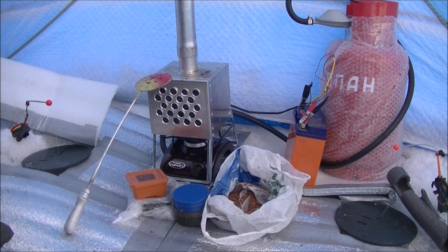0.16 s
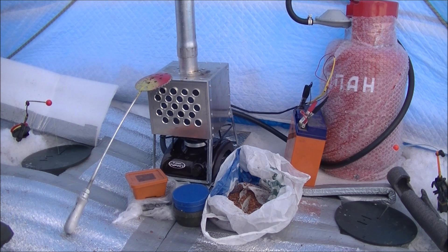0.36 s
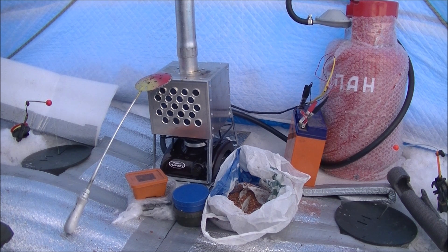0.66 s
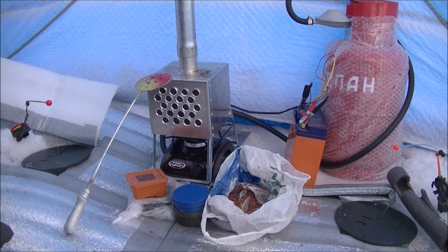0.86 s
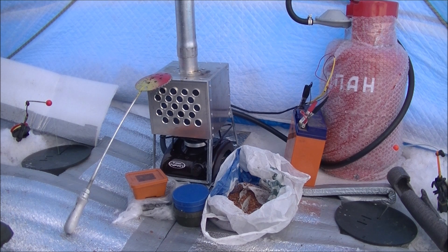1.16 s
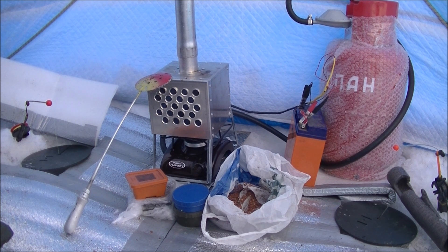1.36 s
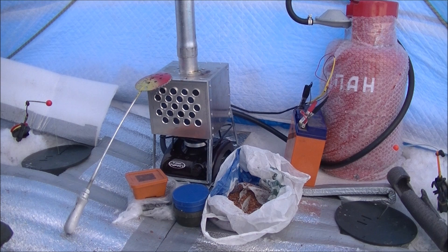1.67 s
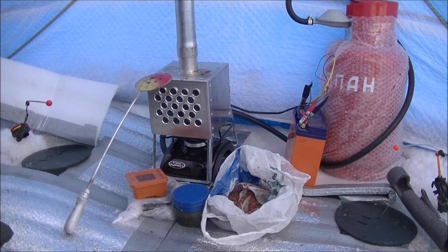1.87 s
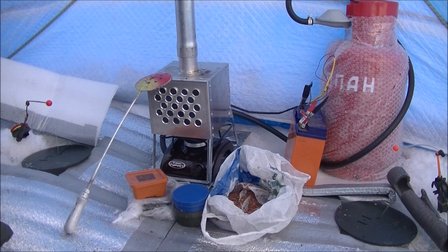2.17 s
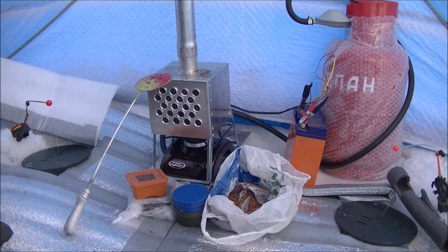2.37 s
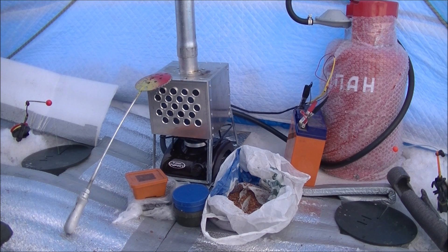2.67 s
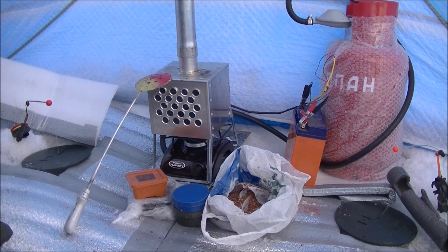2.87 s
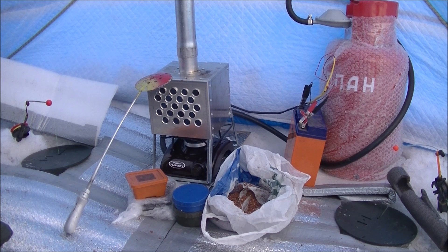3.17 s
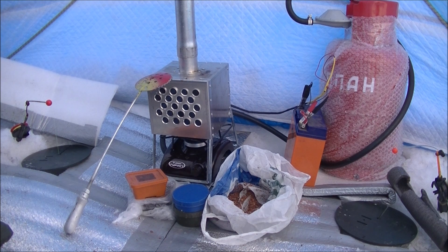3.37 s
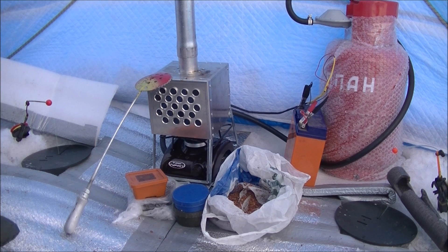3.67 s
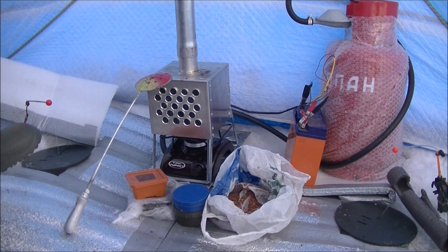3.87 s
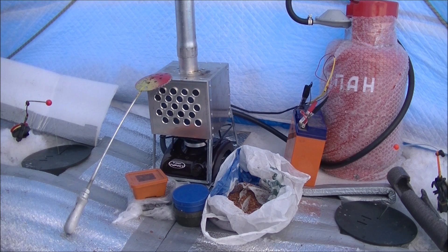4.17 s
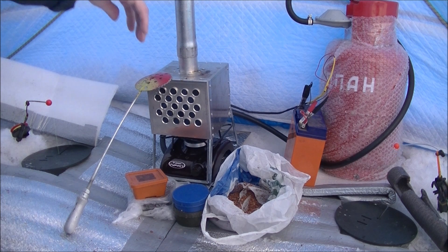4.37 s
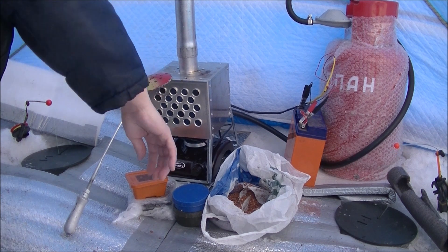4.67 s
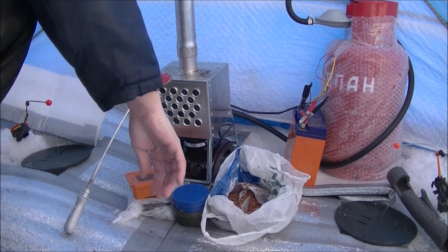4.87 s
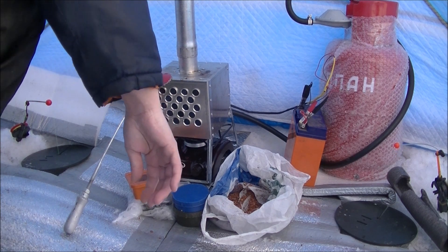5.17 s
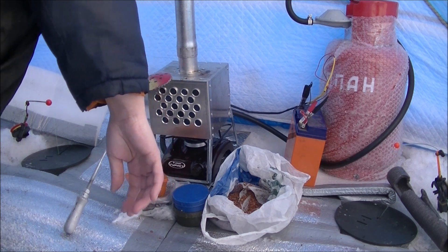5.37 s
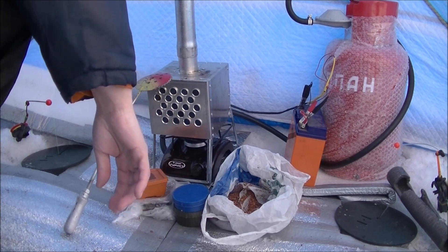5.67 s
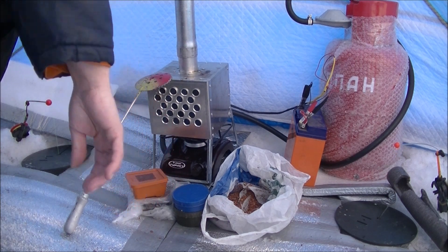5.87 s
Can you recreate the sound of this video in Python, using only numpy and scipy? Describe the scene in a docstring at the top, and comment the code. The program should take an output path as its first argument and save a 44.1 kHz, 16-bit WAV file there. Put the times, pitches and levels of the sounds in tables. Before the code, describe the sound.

Padded nylon jacket rustles and creases close to the microphone, with sharp fabric snaps and a brief metal rattle over a faint steady burner hiss.

```python
"""Inside a tent, a padded nylon jacket rubs and creases close to a small stereo camera.
Fibre slips make the rub; folds and seams snap as short cracks, padding gives hollow notes, a taut fold hums.
A metal piece of gear chatters as dying modes, and weight shifts thump the floor mat as low noise.
A gas burner hisses behind with a faint whistle; two microphone ports hear the near sounds and the hiss
with different stereo widths."""
import sys
import numpy as np
from scipy import signal
from scipy.fft import rfft, irfft, next_fast_len
from scipy.io import wavfile
from scipy.ndimage import uniform_filter1d

SR = 44100
rng = np.random.default_rng(int(sys.argv[2]) if len(sys.argv) > 2 else 0)


def makeup_ratio(level_db):
    """Linear amplitude ratio for a level in decibels (20 dB per factor of ten)."""
    decades = np.asarray(level_db, float) / 20
    return 10 ** decades


def store_wav(level_fs):
    """Save 16-bit WAV to argv[1]."""
    pcm = np.round(np.clip(np.atleast_2d(level_fs), -1, 1) * 32767)
    wavfile.write(sys.argv[1], SR, pcm.T.astype(np.int16))


N = 265482  # length in samples


def evened(x):
    """Scales to rms 1."""
    return x / np.sqrt(np.mean(x ** 2) + 1e-20)


def read(points, hz):
    """Reads a table on a log-frequency axis."""
    f, value = np.transpose(points)
    return np.interp(np.log(hz + 1), np.log(f + 1), value)


def add(mix, s, sound):
    """Mixes a sound in at s seconds."""
    part = mix[:, round(s * SR):][:, :sound.shape[1]]
    part += sound[:, :part.shape[1]]


def colour(x, gain):
    """Filters by a gain that is a function of frequency."""
    length = x.shape[-1]
    size = next_fast_len(length)
    spectrum = rfft(x, size) * gain(np.fft.rfftfreq(size, 1 / SR))
    return irfft(spectrum, size)[..., :length]


def below(hz, edge_hz, steep=8):
    """Share under a soft edge, falling from 1 to 0 through one half at the edge."""
    return 1 / (1 + (hz / edge_hz) ** steep)


def control_times():
    """Times in seconds of the slow controls, one every millisecond."""
    return np.arange(0, N / SR + 1, 1 / 1000)


def curve(rows, column):
    """One column of a timed table, every millisecond."""
    s, value = np.transpose(rows)[[0, column]]
    return np.interp(control_times(), s, value)


def sampled(control):
    """A millisecond control at every sample."""
    return np.interp(np.arange(N) / SR * 1000, np.arange(len(control)), control)


def swells(rows, under_db):
    """Level of overlapping swells every millisecond, and their further columns weighted by strength."""
    pointed = 0.93  # 1 = straight slopes in dB to a sharp crest, 2 = a round crest
    s, db, rise, fall, *marks = np.transpose(rows)[..., None]
    late = control_times() - s
    slope = abs(late / np.where(late < 0, rise, fall)) ** pointed
    power = makeup_ratio(2 * db - 48.7 * slope)  # one rise or fall time away, a swell is 24.35 dB down
    total = power.sum(0) + makeup_ratio(2 * under_db)
    return 10 * np.log10(total), *[(power * mark).sum(0) / total for mark in marks]


def narrow(hz, pole_width_hz):
    """Noise through two equal poles, carried on a moving note, at rms 1."""
    carrier = np.exp(2j * np.pi * np.cumsum(hz * np.ones(N)) / SR)
    r = np.exp(-np.pi * pole_width_hz / SR)
    a, b = signal.lfilter([1], np.convolve([1, -r], [1, -r]), rng.standard_normal((2, 2, N)))
    return evened((carrier * (a + 1j * b)).real)


def hum(rows, pole_width_hz, rest_db=-110):
    """Swells of noise around a note that glides from row to row."""
    level_db = swells(rows, rest_db)[0]
    return makeup_ratio(sampled(level_db)) * narrow(sampled(curve(rows, column=4)), pole_width_hz)


def ring(hz, t60, contact):
    """A dying sine with a soft start (contact in seconds), and the same note at another phase."""
    t = np.arange(round(t60 * SR) + 8) / SR
    phase = 2 * np.pi * (hz * t + np.array([[0], [rng.random()]]))
    return np.minimum(t / contact, 1) * makeup_ratio(-60 * t / t60) * np.sin(phase)


def burner(waver_hz=18):
    """Steady hiss of the flame and the air as shaped noise, with a faint wavering whistle at the jet."""
    # Hiss spectrum. Each row: frequency in Hz, relative density in dB per Hz.
    hiss_shape = [(15, -71), (25, -21), (75, -6.5), (189, -2.5), (228, -2.5), (290, -3.5), (423, -6.5),
                  (472, -15), (808, -13.5), (1150, -18), (1390, -10.5), (3030, -4.5), (3370, -0.5),
                  (6440, -12), (15700, -15.5)]
    # Strength of the jet whistle. Each row: time in seconds, level in dB.
    whistle_level = [(0, -84), (2, -77), (2.4, -70), (3.15, -75), (3.4, -71), (3.7, -92), (4.2, -110)]
    hiss = evened(colour(rng.standard_normal((2, N)), lambda f: makeup_ratio(read(hiss_shape, f))))
    waver = evened(uniform_filter1d(rng.standard_normal(N), SR // 5))
    whistle = narrow(3400 + waver_hz * waver, 9)
    return makeup_ratio(-66.5) * hiss + makeup_ratio(sampled(curve(whistle_level, column=1))) * whistle


def cloth(hz):
    """Gain of the fabric's spectrum, raised at the hollow notes of the folded jacket."""
    # Fabric close to the microphone. Each row: frequency in Hz, relative density in dB per Hz.
    fabric = [(120, -57), (200, -20), (326, -17), (494, -16.5), (560, -20.5), (696, -21.5), (1000, -18.5),
              (1720, -9.5), (2600, -4.5), (3500, 1), (4900, 2.5), (7020, -9.5), (9600, -7), (11000, -18),
              (13500, -24), (15700, -21)]
    # Hollow notes of the padding. Each row: note in Hz, width in Hz, boost in dB.
    hollows = [(283, 120, 2.5), (560, 36, 6)]
    boost_db = sum(db / (1 + (2 * (hz - f) / width) ** 2) for f, width, db in hollows)
    return makeup_ratio(read(fabric, hz) + boost_db)


def rub(slips_per_s=17000, spread_db=0.33, patchy_db=0.76, ribs_db=2.23, flicker_db=0.07, lumpy_db=3.0,
        pivot_hz=4200):
    """Dense fibre slips of uneven size; patches of weave drift through the spectrum under each stroke."""
    # Sleeve strokes. Each row: loudest moment in seconds, 2.5-6.5 kHz level in dB, rise and fall in
    # seconds, brightness in dB per octave, extra body in dB.
    strokes = [(1.008, -55, 0.06, 0.43, 1, 3), (1.064, -40, .015, 0.042, 0.5, -14),
               (1.189, -39.5, 0.06, 0.039, -7, 4), (1.381, -43.5, 0.0055, 0.04, -11.5, 13),
               (1.83, -51.5, 0.067, .1, -2, 1), (1.884, -39, 0.065, 0.076, -3, -5),
               (2.113, -56.5, 0.024, 0.083, -10, 15.5), (2.17, -41.5, 0.059, 0.098, -0.5, -2.5),
               (2.407, -39, 0.0026, 0.032, -8, 11), (2.47, -48, 0.09, .12, -1.5, 4),
               (2.714, -48.5, 0.087, 0.11, 1, -1), (2.778, -52.5, 0.12, 0.03, -9, 11),
               (2.969, -51.5, .02, 0.15, -2, 4), (3.015, -50, 0.1, 0.076, -1, -9),
               (3.111, -59, 0.081, 0.13, -9, 9.5), (3.5, -54.5, 0.13, 0.86, -1.5, -1),
               (3.65, -50, .02, 0.44, -1, 12), (3.75, -41.5, 0.25, 0.23, -3, -3.5),
               (3.805, -38.5, 0.098, 0.13, -0.5, -5.5), (3.881, -38, 0.037, 0.04, 7.5, 3.5),
               (4.02, -45, 0.27, 0.17, 1, 4), (4.07, -40, 0.14, 0.11, 3.5, -2),
               (4.118, -38, 0.23, 0.026, -2, -8.5), (4.22, -49, 0.17, 0.31, 0, 3.5),
               (4.285, -46, 0.042, 0.16, 3, 0.5), (4.338, -34.5, 0.055, 0.076, -3.5, -.7),
               (4.41, -43, 0.073, 0.23, 5, 7), (4.484, -42.5, 0.43, 0.21, -1.5, -4),
               (4.6, -50, 0.32, .3, 2, -3), (4.735, -45, 0.5, 0.66, -3, 1.5),
               (4.845, -39, 0.13, 0.12, 3, -4), (4.9, -48, 0.16, 0.13, -3, 10),
               (5.041, -49, 0.75, 0.15, 5, -3.7), (5.162, -51.5, 0.24, 0.23, 3, -4),
               (5.296, -51.5, 0.099, 0.17, 3, 2.5), (5.394, -50.5, 0.1, 0.28, -0.5, -6),
               (5.478, -47.5, 0.19, 0.13, 3.5, -2), (5.547, -55, 0.25, 0.44, 2.5, 0),
               (6.017, -50, 0.092, .1, 2.5, -1.5)]
    # The jacket never quite rests. Each row: time in seconds, rub between strokes in dB.
    fidget = [(0, -67.5), (.487, -67), (.762, -61.5), (.856, -63), (.968, -59.5), (1.28, -57), (1.44, -57),
              (1.556, -65), (1.72, -59.5), (1.8, -62), (2.03, -64.5), (2.39, -70.5), (2.64, -73),
              (2.82, -65.5), (2.92, -63), (3.2, -68.5), (3.4, -73), (5.71, -68), (5.9, -57), (6.02, -59.5)]
    # Slow level of the other bands against the rub.
    # Each row: time in seconds, treble in dB, low-middle in dB, bass in dB.
    band_levels = [(0, -10, -8.5, -17), (.8, -12, -11.5, -23), (1.2, -13, -16.5, -25.5),
                   (1.45, -17, -14, -25), (1.6, -4, -13, -22.5), (1.9, -12, -13, -21),
                   (2.5, -8.5, -14.5, -17), (2.7, -6, -12.5, -20), (2.9, -13, -15, -22),
                   (3.15, -10, -13, -18), (3.5, -7.5, -11.5, -22.5), (3.8, -7.5, -9, -23.5),
                   (4.0, -1, -4, -17), (4.25, -7.5, -6, -15), (4.7, -5.5, -9.5, -21.5),
                   (5.0, -9.5, -6, -20), (5.45, -10, -11.5, -26.5), (6.02, -7.5, -7, -23)]
    # How treble, low-middle and bass answer a stroke, one row for each band.
    # Each row: dB per dB of rub above medium, dB per unit of brightness, share of the extra body.
    answers = [(-0.085, 0.42, -0.23), (-0.024, -.2, 1), (-0.36, -.1, 0.56)]
    medium_db = -52
    low, mid, high = 900, 2500, 6500  # band edges in Hz

    chance, size = rng.random(N), rng.exponential(1, N)
    slips = (chance < slips_per_s / SR) * makeup_ratio(spread_db * np.minimum(size, 5))
    slips = slips * rng.standard_normal((2, N))
    hz, s, z = signal.stft(slips, SR, nperseg=256, noverlap=192)
    grid = z.T.shape[:2]  # frames, frequencies

    patches = uniform_filter1d(rng.standard_normal(grid), 22, 0)
    patches = evened(uniform_filter1d(patches, 5, 1)).T
    # ribs of the weave sing short narrow notes
    ribs = evened(uniform_filter1d(rng.standard_normal(grid), 24, 0)).T
    flicker = evened(uniform_filter1d(rng.standard_normal(len(s)), 8))
    # big folds buckle one by one, mostly in the low end
    lumps = evened(uniform_filter1d(rng.standard_normal(len(s)), 12))
    lumps_db = lumpy_db * np.outer(below(hz, 1970, steep=1.5), lumps)

    rub_db, bright, body_db = swells(strokes, curve(fidget, column=1))
    # brightness tilts the middle band alone
    octaves = np.log2(np.clip(hz, mid, high) / pivot_hz) * (hz > mid) * (hz < high)
    bright_db = np.outer(octaves, np.interp(s * 1000, np.arange(len(bright)), bright))
    texture_db = patchy_db * patches + ribs_db * ribs + flicker_db * flicker + lumps_db + bright_db
    weave = signal.istft(z * makeup_ratio(texture_db), nperseg=256, noverlap=192)[1][:, :N]

    shares = [lambda f: below(f, high) - below(f, mid),  # middle
              lambda f: 1 - below(f, high),  # treble
              lambda f: below(f, mid) - below(f, low),  # low-middle
              lambda f: below(f, low)]  # bass
    against = [0]  # the middle band follows the rub itself
    for k, (follow, lift, body_share) in enumerate(answers):
        answer_db = follow * (rub_db - medium_db) + lift * bright + body_share * body_db
        against.append(curve(band_levels, column=k + 1) + answer_db)
    out = np.zeros((2, N))
    for db, share in zip(against, shares):
        band = evened(colour(weave, lambda f: cloth(f) * np.sqrt(share(f))))
        out += makeup_ratio(sampled(rub_db + db)) * band
    return out


def snaps(t60=0.0087, width=0.12, hump_db=7, crest_db=10, rise=0.00037, walls_db=-12, walls_t60=0.11,
          thin_hz=350):
    """A crease lets go: a crack humped where that fold resonates, with a quieter tail for the soft walls."""
    # Creases and seams letting go. Each row: crest in seconds, level in dB before the crest allowance
    # and the final filter, centre in Hz.
    seams = [(0.0151, -30, 3930), (0.02, -34, 3770), (0.1206, -35.5, 3100), (0.3076, -35.5, 5200),
             (1.062, -44, 3900), (1.0676, -32, 3820), (1.119, -32.5, 3100), (1.1837, -33, 3120),
             (1.1916, -32, 4130), (1.379, -27, 2570), (1.383, -21, 2790), (2.096, -42, 3000),
             (2.1121, -34, 3690), (2.1723, -39, 4400), (2.2672, -37.5, 3800), (2.4052, -22.5, 3960),
             (2.411, -16.5, 4460), (2.4706, -33, 2270), (2.475, -35.5, 3790), (2.7704, -33, 2740),
             (2.772, -30, 3740), (2.9667, -41, 4110), (3.1012, -34.5, 2800), (3.649, -31, 4070),
             (3.6712, -27, 2500), (3.8854, -30, 4830), (3.9365, -22.5, 4260), (4.3246, -34, 3740),
             (4.3313, -16, 2700), (4.409, -30, 1500), (4.68, -25, 1290), (4.739, -19, 4030),
             (4.8388, -19, 5010), (4.875, -22, 4460), (4.8944, -22, 4640)]
    out, t = np.zeros((2, N)), np.arange(4096) / SR
    decay = makeup_ratio(-60 * t / t60) + makeup_ratio(walls_db - 60 * t / walls_t60)
    shape = np.minimum(t / rise, 1) * decay
    for (s, db, hz), noise in zip(seams, rng.standard_normal((len(seams), 2, 4096))):
        # the hump's width is in octaves
        hump = lambda f: cloth(f) * makeup_ratio(hump_db * np.exp(-(np.log2(f / hz + 1e-9) / width) ** 2))
        add(out, s - rise, makeup_ratio(db - crest_db) * shape * evened(colour(noise, hump)))
    # a thin sheet radiates no bass
    return colour(out, lambda f: below(f, 9100) - below(f, thin_hz, steep=2.7))


def gear():
    """Each bounce rings the same metal modes, harder ones shorter in contact and brighter; also lone pings."""
    # Bounces of the metal piece.
    # Each row: start in seconds, level in dB before the mode's own, hardness in dB per octave.
    bounces = [(1.1475, -18, -13), (1.1531, -26.5, 4.5), (1.1567, -22, -0.5), (1.161, -30.5, 7.5),
               (1.164, -24.5, -4), (1.167, -26, -9), (1.175, -46, -12), (1.181, -45, -6)]
    # Modes of the metal piece. Each row: note in Hz, relative level in dB, 60 dB decay in seconds.
    modes = [(2600, -16.5, 0.054), (2870, -2.5, 0.033), (3180, -1, 0.032), (3300, -17, 0.016),
             (4070, -11.5, 0.032), (5660, 0.5, 0.029), (6020, -11, .02), (6300, -15.5, 0.024),
             (9780, -15, 0.019)]
    # Faint single notes of small gear.
    # Each row: start in seconds, level in dB, note in Hz, 60 dB decay in seconds.
    pings = [(1.15, -53.5, 2832, 1.3), (1.974, -55, 1940, .08), (2.01, -67, 1945, .6),
             (.124, -60, 1400, .05), (1.19, -51, 1170, .06), (1.238, -47, 4300, .03),
             (3.875, -47, 1610, .06), (4.19, -57, 423, .5)]
    out = np.zeros((2, N))
    for s, db, hard_db in bounces:
        contact = 0.0011 * makeup_ratio(-.6 * hard_db)
        for hz, mode_db, t60 in modes:
            level_db = db + mode_db + hard_db * np.log2(hz / 3000)
            add(out, s, makeup_ratio(level_db) * ring(hz, t60, contact))
    for s, db, hz, t60 in pings:
        add(out, s, makeup_ratio(db) * ring(hz, t60, 0.00051))
    return out


def thumps(thin_hz=38):
    """Weight shifts on the floor mat: swells of low noise around its note, thinned at the very bottom."""
    # Each row: loudest moment in seconds, level in dB before thinning, rise and fall in seconds, note in Hz.
    shifts = [(1.012, -59.5, .03, .18, 84.7), (1.19, -83, .1, .2, 114), (3.72, -74, 0.076, .5, 100),
              (3.904, -62.5, .07, 0.25, 79), (4.176, -70, 0.078, 0.68, 97.3), (4.4, -66, .5, .3, 104.5),
              (4.498, -54, .05, 0.098, 106), (4.622, -59, 0.13, 0.28, 80.7), (4.91, -67, 0.19, .21, 99)]
    return colour(hum(shifts, 68), lambda f: 1 - below(f, thin_hz, steep=1.8))


def bumps(t60=0.054, contact=0.0068):
    """The padding is pressed and gives a short hollow note."""
    # Each row: start in seconds, level in dB before the soft start, note in Hz.
    presses = [(1.376, -50.5, 648), (1.874, -55.5, 560), (2.169, -51.5, 560), (2.401, -53, 525),
               (2.451, -44, 492), (2.514, -51, 300), (2.715, -51.5, 574), (2.755, -52.5, 473),
               (2.965, -56.5, 562), (3.102, -47, 524), (3.126, -51.5, 526), (3.672, -46.5, 310),
               (3.879, -49, 335), (4.046, -48, 425), (4.283, -42, 323), (4.33, -49, 555), (4.407, -52, 329),
               (4.473, -42.5, 327), (4.596, -50, 278), (4.72, -47.5, 334), (4.844, -41.5, 545),
               (4.889, -40.5, 550), (4.899, -42, 320), (4.93, -49, 390), (5.04, -55, 334)]
    out = np.zeros((2, N))
    for s, db, hz in presses:
        add(out, s, makeup_ratio(db) * ring(hz, t60, contact))
    return out


def dragged_fold():
    """A taut fold hums while it is dragged: swells of noise around a moving note."""
    # Each row: loudest moment in seconds, level in dB, rise and fall in seconds, note in Hz.
    drags = [(3.71, -52, .06, .25, 2297), (3.79, -42, 0.18, 0.056, 2570), (5.16, -49, .08, .1, 4800),
             (5.46, -47.5, 0.13, .12, 4970)]
    return hum(drags, 300)


def ports(pair, wide):
    """The difference of two ports: partly the sound itself, partly the same sound by another path."""
    # Share of the side that follows the mid. Each row: frequency in Hz, share from -1 to 1 (plus = left louder).
    lean = [(2000, 0.019), (4700, -0.05), (6300, 0.42), (7400, -0.12), (8600, -0.61), (11000, -0.47),
            (13000, 0.15)]
    tied = lambda f: np.clip(read(lean, f), -1, 1)
    side = colour(pair[0], tied) + colour(pair[1], lambda f: np.sqrt(1 - tied(f) ** 2))
    side = colour(side, lambda f: makeup_ratio(read(wide, f)))
    return np.array([pair[0] + side, pair[0] - side])


def scene():
    """Jacket, gear and floor close to the ports, with the burner's hiss at its own width under them."""
    # Stereo width of the near sounds. Each row: frequency in Hz, side over mid in dB.
    near_width = [(60, -22), (92, -57), (140, -32), (210, -20), (330, -28), (500, -61), (1170, -27),
                  (1790, -24.5), (2740, -10.5), (4190, -14), (5700, -4.5), (7000, -3.5), (9810, -4.5),
                  (11500, 4.5), (15000, 5.5)]
    # Stereo width of the burner. Each row: frequency in Hz, side over mid in dB.
    far_width = [(60, -6), (290, 0), (640, -1.5), (1410, -4), (3100, -3), (4300, -5), (5700, 4), (9000, -2),
                 (15000, -1)]
    near = rub() + snaps() + gear() + thumps() + bumps() + dragged_fold()
    return ports(near, near_width) + ports(burner(), far_width)


def top_cut(x):
    """Nothing passes above the cut-off."""
    return signal.sosfilt(signal.butter(12, 15810, fs=SR, output="sos"), x)


def record(dry):
    """The finished two-port mix as the camera keeps it."""
    return top_cut(dry)


dry = scene()
out = record(dry)
store_wav(out)
```